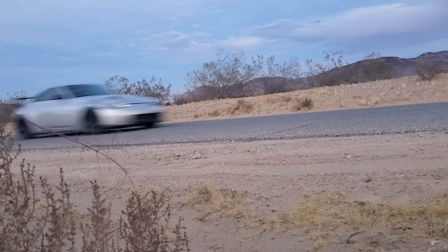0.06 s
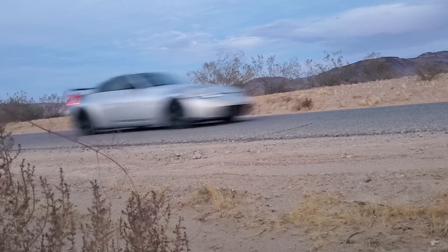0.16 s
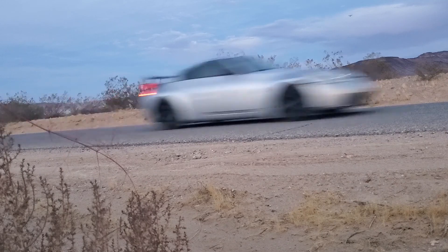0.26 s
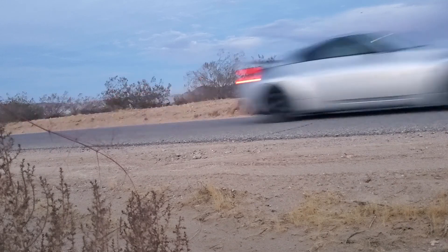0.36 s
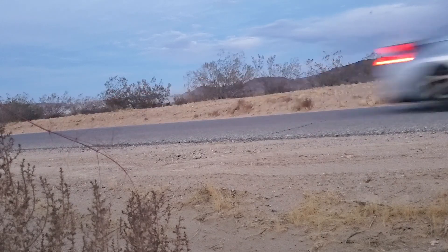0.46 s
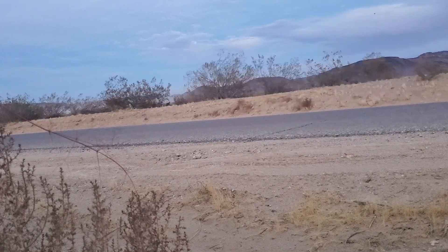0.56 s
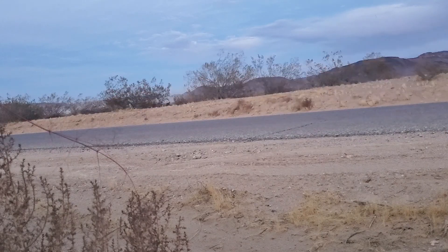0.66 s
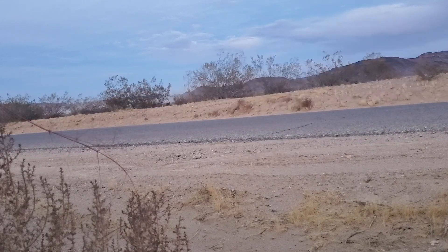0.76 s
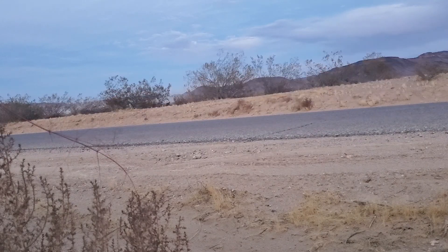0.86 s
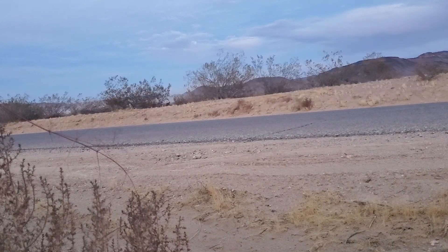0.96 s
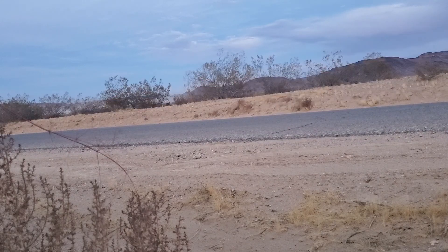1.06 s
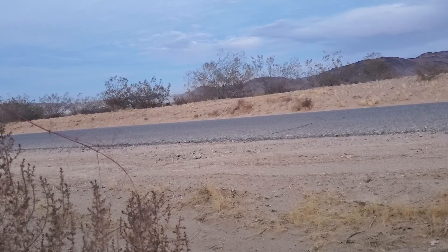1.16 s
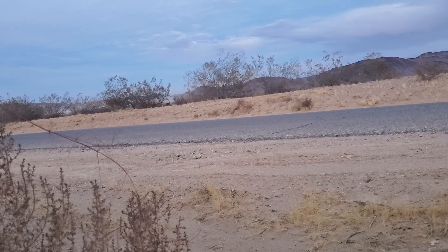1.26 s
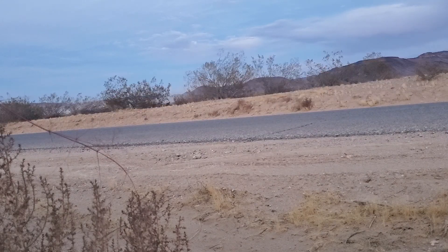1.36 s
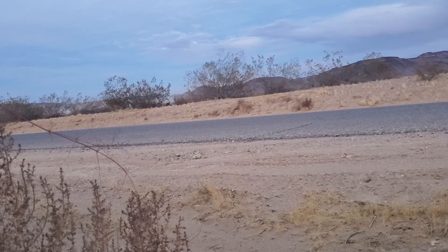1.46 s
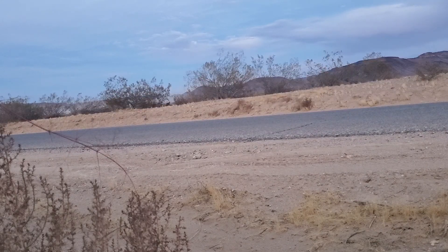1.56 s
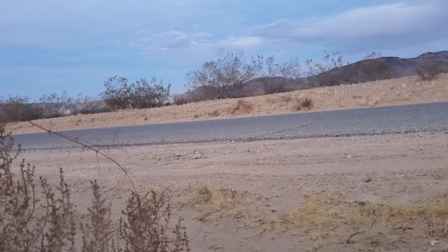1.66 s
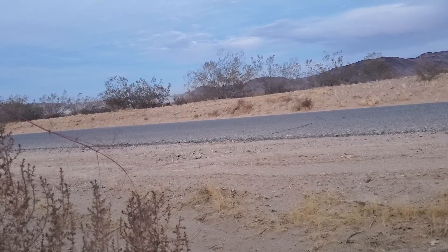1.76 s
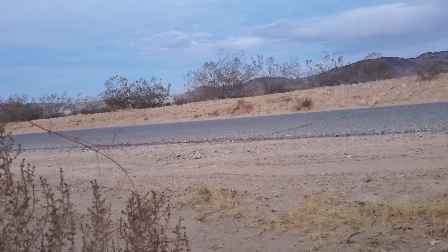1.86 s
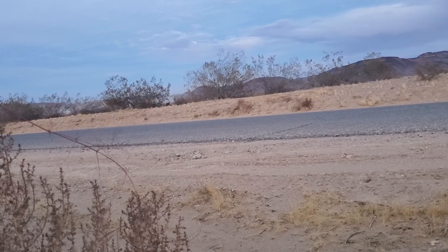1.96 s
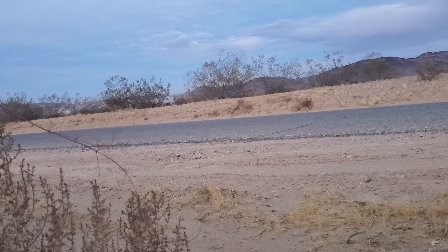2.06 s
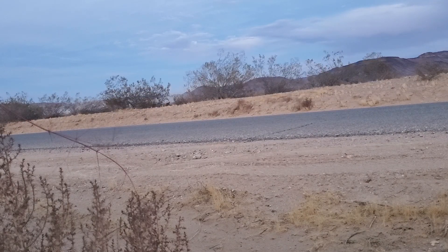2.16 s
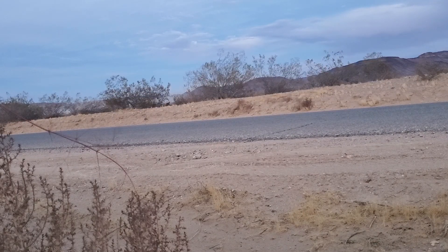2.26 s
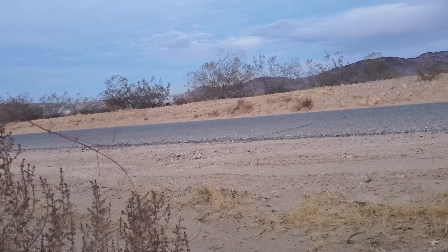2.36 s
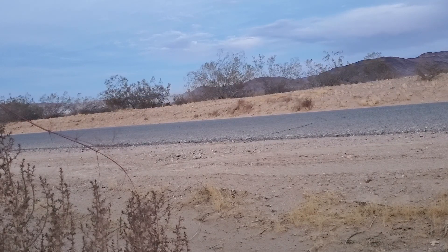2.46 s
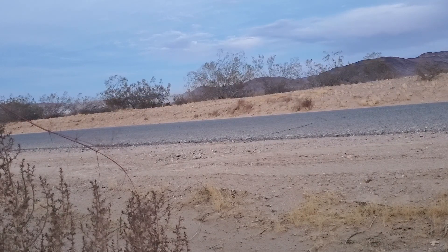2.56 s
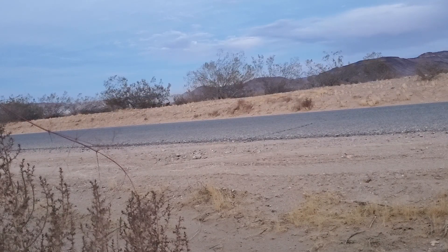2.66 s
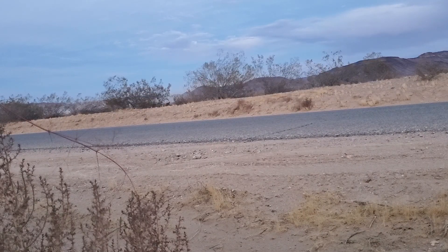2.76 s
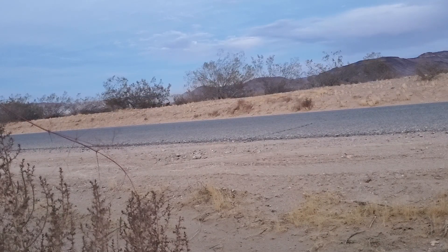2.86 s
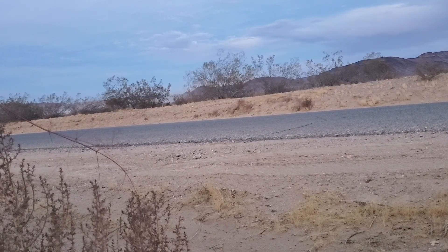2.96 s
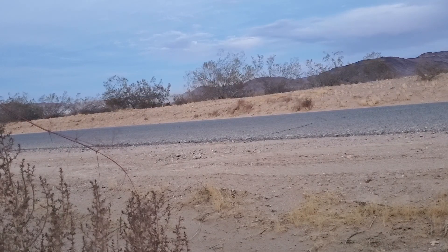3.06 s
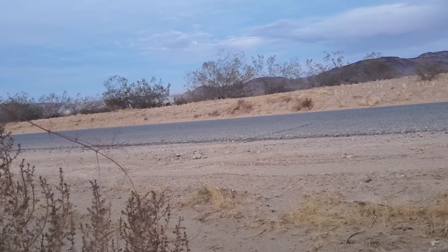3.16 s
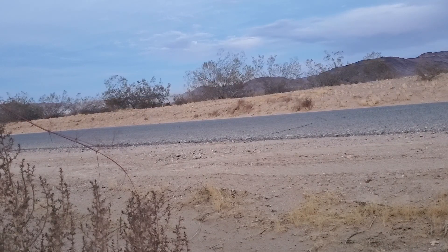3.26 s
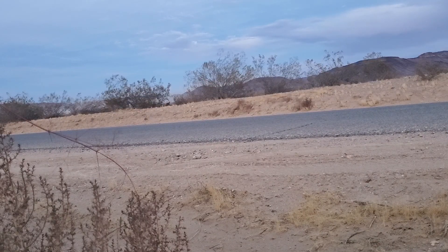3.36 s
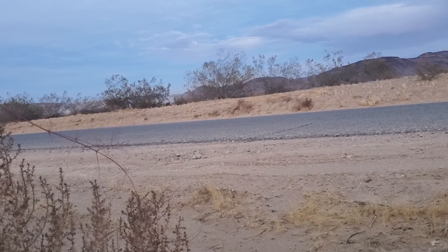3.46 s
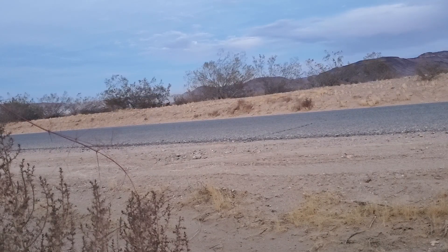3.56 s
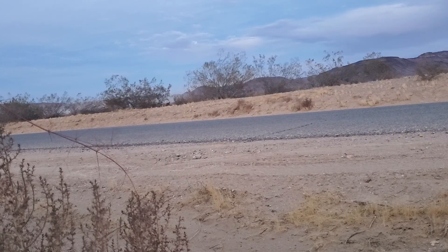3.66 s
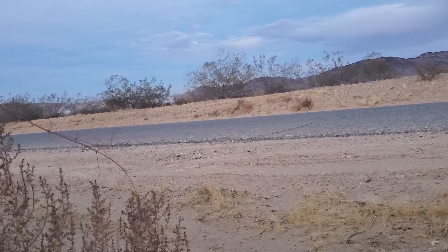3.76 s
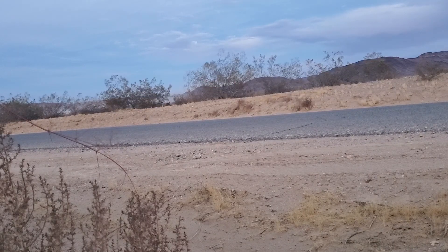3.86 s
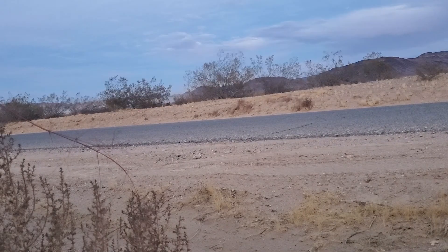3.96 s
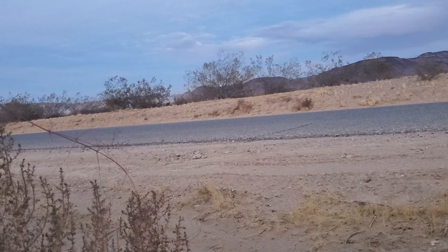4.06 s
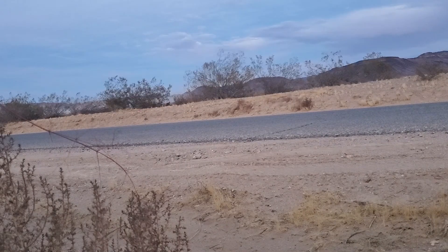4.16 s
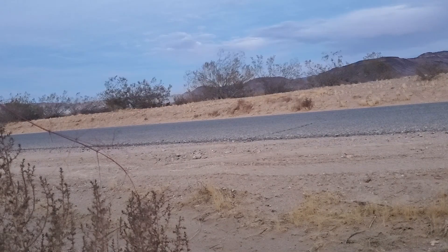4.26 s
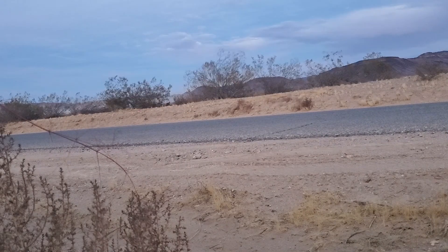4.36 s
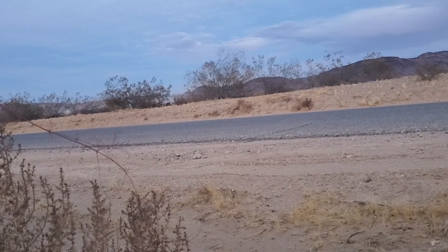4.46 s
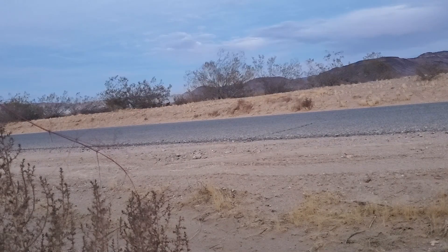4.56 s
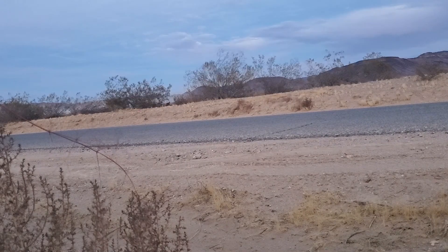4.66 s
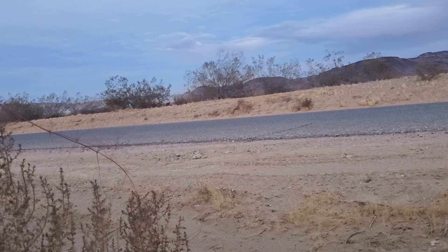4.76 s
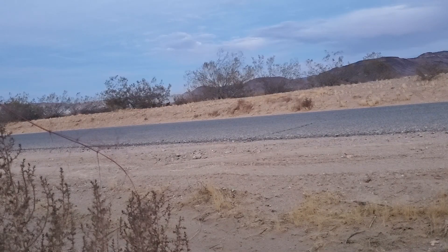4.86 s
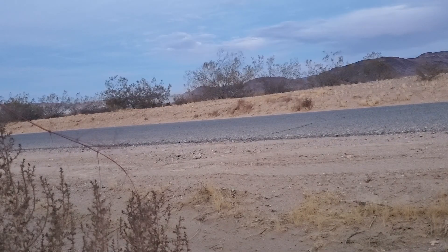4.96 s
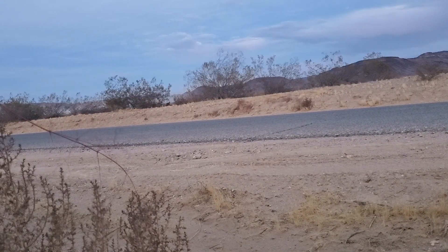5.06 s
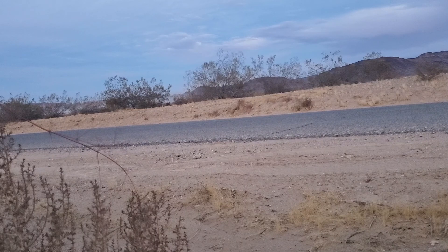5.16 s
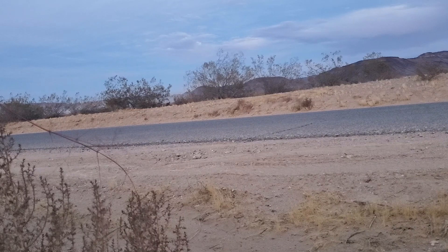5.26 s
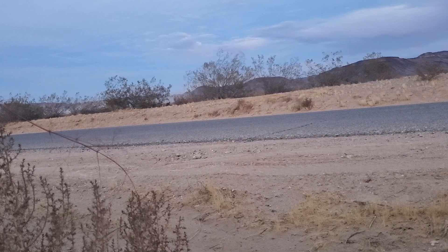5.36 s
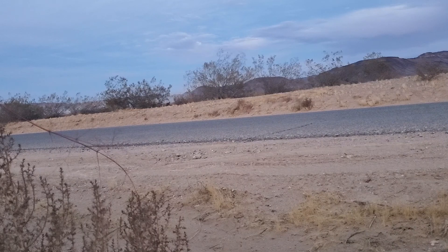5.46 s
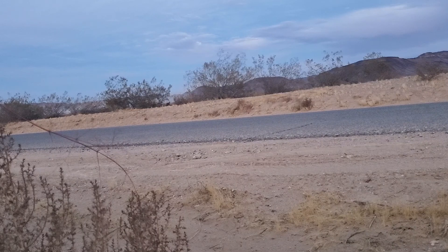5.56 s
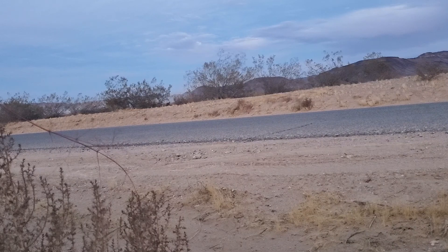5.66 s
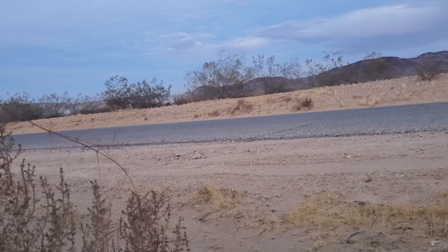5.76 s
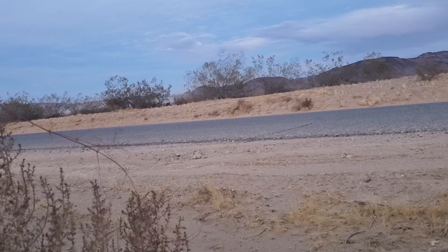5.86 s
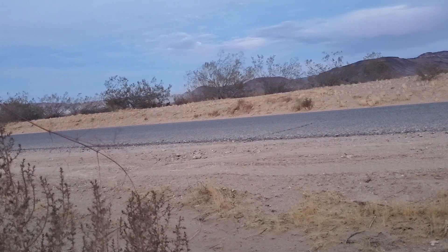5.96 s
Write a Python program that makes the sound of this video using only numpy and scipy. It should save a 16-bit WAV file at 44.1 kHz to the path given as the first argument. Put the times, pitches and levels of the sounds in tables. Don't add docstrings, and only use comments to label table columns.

```python
import sys
import numpy as np
from scipy import signal
from scipy.fft import rfft, irfft, next_fast_len
from scipy.io import wavfile
from scipy.ndimage import uniform_filter1d, map_coordinates

SR = 44100
rng = np.random.default_rng(int(sys.argv[2]) if len(sys.argv) > 2 else 0)


def bounce(signal):
    frames = np.transpose(np.atleast_2d(signal))
    limited = np.clip(frames, -1, 1)
    pcm = np.round(limited * 32767).astype(np.int16)
    wavfile.write(sys.argv[1], SR, pcm)


def volts_from_db(level):
    exponent = np.asarray(level, float) / 20
    return 10 ** exponent


N = 265923
T = np.arange(N) / SR
SIZE = next_fast_len(N)
FREQ = np.arange(SIZE // 2 + 1) * SR / SIZE + 1e-3
STEP = 32
SLOW = np.arange(0, N + STEP, STEP) / SR
CUT_S = 3.9585

# (time [s], firing rate [Hz], level [dB])
APPROACH = [(0, 135, -32.5), (.05, 153.6, -28.5), (.09, 149, -26), (.12, 147.7, -21.5), (.15, 162.8, -29.5),
            (.175, 165, -30.5), (.195, 156, -12), (.22, 150.6, -27), (.245, 142.7, -27.5)]
# (time [s], firing rate [Hz], level [dB])
COAST = [(.27, 134.9, -17), (.35, 132.1, -18), (.52, 119.8, -21.5), (.72, 107.2, -27.5),
         (.975, 95.3, -29.5), (1.35, 82.84, -30.5), (1.85, 68.66, -31.5), (2.6, 48.97, -40.5),
         (3.2, 35.35, -38), (3.8, 22.7, -42.5), (3.95, 21.9, -46)]
# (time [s], firing rate [Hz], level [dB])
PULL = [(3.965, 83.93, -50), (4.035, 76.65, -51), (4.105, 65.68, -39), (4.245, 59.03, -40.5),
        (4.35, 62.3, -38.5), (5.6, 84.16, -33.5), (6.03, 92.05, -32)]
SHUT_DB, OPEN_DB = (-0.5, -3.5, -10, -8), (-2.5, 0.3, -2, -5)
# (frequency [Hz], level [dB])
SHUT_TONE = [(25, -31), (60, 5), (90, 12), (118, 13), (150, 7.5), (215, 8), (280, -6.5), (450, -10.5)]
# (frequency [Hz], level [dB])
OPEN_TONE = [(60, -5.5), (95, 10.5), (150, 15.5), (190, 2.9), (228, 0), (255, 8.5), (335, -10.5),
             (400, -16)]
# (frequency [Hz], width [Hz], level [dB])
PIPE = [(142, 45, 4), (215, 45, 0), (340, 130, -5), (540, 200, -11), (820, 300, -15)]
# (time [s], frequency [Hz], depth [dB], length [s])
ORDER_DIPS = [(0.118, 300, -5, .015), (0.325, 310, 22, 0.035), (0.447, 131.1, 6, 0.056), (.5, 356, -3.5, .12),
              (0.715, 203.7, 25, 0.085), (1.04, 395.6, -12.5, 0.23), (1.25, 227.8, 25.5, 0.25),
              (1.961, 124, 6.5, 0.25), (2.206, 264.3, 24, 0.085), (3.258, 148.7, -8.5, 0.15),
              (3.88, 82.3, 12, .11), (4, 78.7, -23, 0.098), (4.032, 250, -11.5, 0.044)]
# (time [s], level [dB], length [s])
RASP_SWELLS = [
    (1.047, 5.5, 0.14),
    (1.703, -10, 0.41),
    (4.902, 3, 0.33),
    (5.955, 7, .15),
    (3.452, -1, .12),
    (3.756, 4, 0.073),
]
# (time [s], peak level [dB], ring [Hz], swell [s])
BOOMS = [
    (.01, -27, 303, 0.017),
    (0.051, -23, 230, 0.027),
    (0.091, -11.5, 101, 0.016),
    (.11, -23.5, 299, 0.015),
    (0.144, -14, 195, 0.025),
    (0.149, -15.5, 100, 0.0096),
    (0.221, -10.5, 95, 0.011),
    (0.235, -19.5, 258.6, 0.0082),
    (3.959, -20.5, 103, 0.0054),
    (4.031, -28.5, 103.6, 0.016),
]
# (time [s], frequency [Hz], level [dB])
WHISTLE = [(0, 14050, -60), (.04, 13700, -60), (.065, 13400, -72), (.09, 13100, -59), (.18, 12050, -62),
           (.21, 11900, -68), (.24, 11700, -63), (.3, 11200, -75), (.35, 11000, -110)]
# (time [s], frequency [Hz], level [dB])
SPOOL = [(4.2, 3473, -100), (4.5, 3470, -97), (4.65, 3560, -75), (4.75, 3650, -76), (4.9, 3620, -110)]
HISS_HZ = (600, 1800, 3400, 4900)
# (level when nearest [dB], loss [dB per dB of distance],
# extra loss far off [dB per dB squared], gain on boost [dB])
HISS = [
    (-30, 1.033, 0.003, 5),
    (-32.5, 1.26, 0.0011, 0),
    (-35.5, 1.7649, 0.00075, 9),
    (-45, 0.74, 0.076, 19.5),
]
# (frequency [Hz], level [dB])
HISS_TONE = [(25, -28), (60, -5.5), (200, 1), (450, -3.5), (800, 1.5), (1150, 2), (1650, -0.5), (2500, -1),
             (3300, -2), (4500, -3.5), (6500, 2.5), (8500, -6.5), (12000, -3), (15500, 2.5)]
# (time [s], level [dB])
NEAR = [(0, -1), (.12, -1.5), (.24, -2), (.3, -5.5), (.45, -6), (.65, -9.5), (.87, -13.5), (1.1, -15.5),
        (1.5, -17.5), (2.0, -18), (3, -19.5), (3.94, -22.5), (3.97, -25), (4.2, -26), (4.9, -23.5),
        (5.5, -22.5), (6.03, -22)]
# (time [s], centre [Hz], level [dB], length [s])
GUSTS = [(.0, 3000, -4.5, .03), (0.087, 1810, 3, 0.055), (.1, 904.4, -2.5, 0.16), (2.86, 6460, 3, 0.051),
         (5.748, 6520, -3, .1), (5.974, 5910, 3, .06), (0.184, 2630, 3.5, 0.092), (0.334, 1640, 4.5, .14),
         (0.798, 1800, 4.5, .15), (1.295, 5000, 6.5, 0.42), (1.68, 3300, 5.5, 0.05), (2.04, 6500, -18, 0.1),
         (2.15, 1200, 6.5, 0.2), (2.325, 3200, 6, 0.12), (2.722, 3400, 2.5, 0.078),
         (3.03, 4200, -7.5, 0.053), (3.27, 3000, 6, 0.096), (3.595, 4979, -12.5, 0.24),
         (3.8, 2200, 8, 0.37), (4.078, 3600, 1, 0.048), (4.326, 3763, 7.5, .11), (4.546, 5000, 8.5, 0.28),
         (4.82, 1900, 4, 0.11), (4.84, 4200, -4, 0.061), (5.0, 4200, 4.5, 0.073), (5.297, 4500, -1, .15),
         (5.855, 2800, 3.5, 0.13)]
# (time [s], length [s], notch [Hz], climb [Hz per s], depth [dB])
GROUND = [
    (1.3, .9, 2540, 30.2, 11),
    (3.747, .3, 1314, 30.04, 8),
    (4.353, 0.29, 2440, 100, 17),
    (5.444, 0.27, 1450, 1168, 11),
]
# (notch [Hz], depth [dB])
BANK_DIP = (1270, 8.7)
# (time [s], peak level [dB], frequency [Hz])
TICKS = [
    (1.33, -59, 6163),
    (3.223, -53.5, 5000),
    (3.9584, -40.5, 6000),
]
# (frequency [Hz], left minus right level [dB])
PORTS = [(60, -1.5), (110, -2.0), (200, -2.0), (380, -2.5), (700, -4.0), (1290, -4.0), (2380, -1.5),
         (4400, -5.0), (8120, -4.5), (15000, -4.5)]
# (frequency [Hz], level [dB per Hz])
SELF_NOISE = [(2500, -13), (3600, -3), (4400, -16.5), (5350, -2.5), (6100, -14.5), (6900, -5),
              (7800, -19.5), (9000, -18), (11500, -19.5), (12200, -37.5), (15500, -34.5)]


def exhaust(count=10):
    hz, level_db = curve(APPROACH + COAST + PULL)
    ahead_db = -7 * (SLOW < COAST[0][0])
    rasp_db = -25.5 + 0.51 * level_db + ahead_db
    rasp_db = rasp_db + sum(db * bump(s, length) for s, db, length in RASP_SWELLS)
    cycle = np.cumsum(fine(hz * (1 + 0.0017 * walk(30)))) / SR
    grid = np.arange(1, 3000.)
    response = pipe(grid)
    ring_db = 20 * np.log10(np.abs(response))
    ring_angle = np.unwrap(np.angle(response))
    out = np.zeros(N)
    for k in range(1, count + 1):
        upper = k - len(SHUT_DB) - 1
        if upper < 0:
            db = level_db + order_db(k, hz) + 0.57 * walk(7.6)
            wander = 0
        else:
            db = np.minimum(rasp_db, -33) - 0.8 * upper + 3.5 * walk(5)
            db = db + np.interp(k * hz, grid, ring_db)
            wander = .05 * upper * walk(25)
        angle = fine(np.interp(k * hz, grid, ring_angle) + wander)
        out -= np.sqrt(2) * fine(volts_from_db(db)) * np.cos(2 * np.pi * k * cycle + angle)
    return out, cycle % 1


def order_db(k, hz):
    shut = SHUT_DB[k - 1] + on_log(SHUT_TONE, k * hz)
    pulling = OPEN_DB[k - 1] + on_log(OPEN_TONE, k * hz)
    db = np.where(SLOW < CUT_S, shut, pulling)
    return db - sum(dip(k * hz, f, depth * bump(s, length)) for s, f, depth, length in ORDER_DIPS)


def pipe(hz):
    out = 0
    for k, (f, width, db) in enumerate(PIPE):
        out = out + (-1) ** k * volts_from_db(db) / (1 + 1j * (hz / f - f / hz) * f / width)
    return out


def backfires():
    out = np.zeros(N)
    for s, db, hz, swell in BOOMS:
        age = np.clip(T - s, 0, 1) / max(swell, .002)
        out += volts_from_db(db) * age * np.exp(1 - age) * np.sin(2 * np.pi * hz * (T - s))
    return out


def turbo(rows, wobble):
    hz, db = curve(rows)
    turns = np.cumsum(fine(hz * (1 + wobble * walk(120)))) / SR
    return np.sqrt(2) * fine(volts_from_db(db + 2 * walk(55))) * np.sin(2 * np.pi * turns)


def hiss(phase):
    level = hiss_levels()
    lag_ms, share = bearing()
    gusts = np.array([db * bump(s, length) for s, f, db, length in GUSTS])
    gust_hz = np.array(GUSTS)[:, 1]
    notches = [(np.maximum(f + climb * (SLOW - s), 100), depth * bump(s, length))
               for s, length, f, climb, depth in GROUND]
    shade = np.clip(.4 + 1.3 * lag_ms, 0, 1) * np.array([[.5], [-.5]])
    puff = np.cos(2 * np.pi * phase) * (T > .25)
    air = rfft(rng.standard_normal((3, SIZE)))
    common, apart, drift = 0, 0, walk(1)
    for hz in 26.6 * 2 ** np.arange(0, 9.4, 1 / 3):
        place = np.interp(np.log(hz), np.log(HISS_HZ), np.arange(4))
        low, high = int(place), min(int(place) + 1, 3)
        db = level[low] + place % 1 * (level[high] - level[low])
        db = db + np.exp(-(np.log2(hz / gust_hz) / 1.1) ** 2) @ gusts
        db = db - sum(dip(hz, *notch) for notch in notches)
        db = db - dip(hz, *BANK_DIP) * (SLOW > CUT_S)
        db = db - 0.17 * max(np.log2(hz / HISS_HZ[-1]), 0) * (level[-1].max() - level[-1])
        drift = .8 * drift + .6 * walk(4)
        db = db + on_log(HISS_TONE, hz) + 0.12 * drift + 0.57 * walk(18)
        gain = volts_from_db(db + on_log(PORTS, hz) * shade)
        puffs = 1 + 0.072 * puff / (1 + hz / 900)
        noise = irfft((air * band(hz, 1 / 3)).astype(np.complex64), SIZE)[:, :N]
        noise = puffs * noise / np.std(noise[0])
        same = np.clip(share, .01, .99) ** (hz / 2000)
        common = common + np.array([fine(g) for g in gain * np.sqrt(same)]) * noise[0]
        apart = apart + np.array([fine(g) for g in gain * np.sqrt(1 - same)]) * noise[1:]
    return common, apart


def hiss_levels():
    near = curve(NEAR)[0]
    boost = np.clip((SLOW - 4.2) / 0.13, 0, 1)
    return np.array([db + loss * near - far * near ** 2 + gain_db * boost for db, loss, far, gain_db in HISS])


def rumble():
    from_peak_s = SLOW - 0.13
    passing = -18.5 - np.maximum(-50.5 * from_peak_s, 55.5 * from_peak_s)
    far = -43 + 2 * bump(4.02, .08) + 8 * bump(0.2, .5)
    return fine(volts_from_db(np.maximum(passing, far) + 2 * walk(25))) * shaped(band(150, 3.0))


def ticks():
    out = np.zeros(N)
    for s, db, hz in TICKS:
        click = irfft(band(hz, 3.0) * np.exp(-2j * np.pi * FREQ * s), SIZE)[:N]
        out += volts_from_db(db) * click / click.max()
    return out


def self_noise():
    level_db = -84.5 + 6.5 + np.array([[-1.4], [1.4]])
    gain = volts_from_db(on_log(SELF_NOISE, FREQ)) * (FREQ > 2500)
    return volts_from_db(level_db) * np.array([shaped(gain) for _ in range(2)])


def bearing():
    abeam_s, swing_s = .38, .22
    share = .855 + .075 * np.tanh((SLOW - .62) / .08) - .21 * bump(.43, .17)
    return .13 + .345 * np.tanh((SLOW - abeam_s) / swing_s), share


def later(x, ms):
    return map_coordinates(x, [np.arange(N) - ms * SR / 1000], order=3, mode="nearest")


def dip(hz, notch_hz, depth_db):
    return depth_db * np.exp(-(np.log2(hz / notch_hz) / .28) ** 2)


def bump(s, length):
    return np.exp(-((SLOW - s) / length) ** 2)


def walk(rate):
    k = int(SR / STEP / rate)
    held = np.repeat(rng.standard_normal(len(SLOW) // k + 1), k)
    return 1.68 * uniform_filter1d(uniform_filter1d(held, k), k)[:len(SLOW)]


def band(hz, octaves):
    return np.cos(np.pi / 2 * np.clip(np.log2(FREQ / hz) / octaves, -1, 1)) ** 2


def shaped(gain):
    x = irfft(rfft(rng.standard_normal(SIZE)) * gain, SIZE)[:N]
    return x / np.std(x)


def curve(rows):
    s, *cols = np.transpose(rows)
    return [uniform_filter1d(np.interp(SLOW, s, c), size=8) for c in cols]


def on_log(rows, hz):
    f, v = np.transpose(rows)
    return np.interp(np.log(hz), np.log(f), v)


def fine(x):
    return np.interp(T, SLOW, x)


def top_when_strong(x):
    top = irfft(rfft(x, SIZE) * (FREQ > 11950), SIZE)[:, :N]
    strong = uniform_filter1d(np.mean(top ** 2, axis=0), size=1024) > volts_from_db(2 * -84.5)
    return x - top * (1 - uniform_filter1d(1. * strong, size=512))


def scene():
    lag_ms = fine(bearing()[0])
    tones, phase = exhaust()
    bass = tones + backfires() + rumble()
    common, apart = hiss(phase)
    common = common + turbo(WHISTLE, .007) + turbo(SPOOL, 0.012) + ticks()
    left = volts_from_db(-0.5) * later(bass, 1.37 * lag_ms) + later(common[0], lag_ms)
    right = volts_from_db(1.58) * bass + common[1]
    return np.array([left, right]) + apart


def top_cut(x):
    return signal.sosfilt(signal.butter(12, 15760, fs=SR, output="sos"), x)


def record(dry):
    roll_off = signal.butter(2, 25, "high", fs=SR, output="sos")
    x = signal.sosfilt(roll_off, dry + self_noise())
    x = top_when_strong(np.tanh(.8 * x) / .8)
    return top_cut(x)


dry = scene()
out = record(dry)
bounce(out)
```